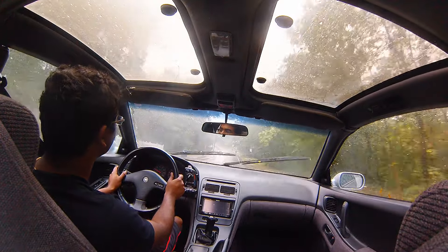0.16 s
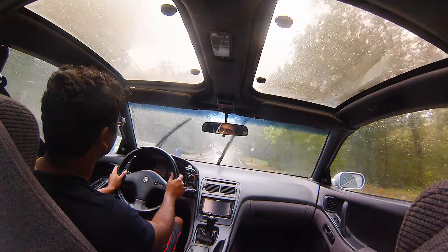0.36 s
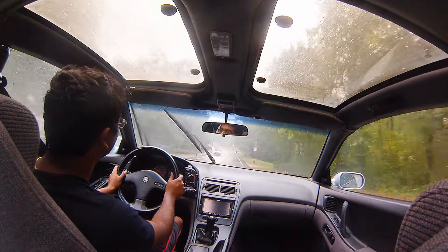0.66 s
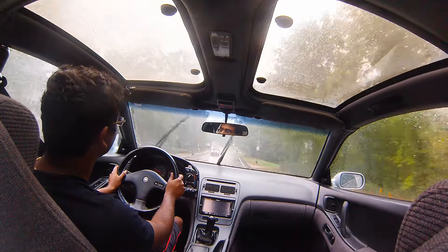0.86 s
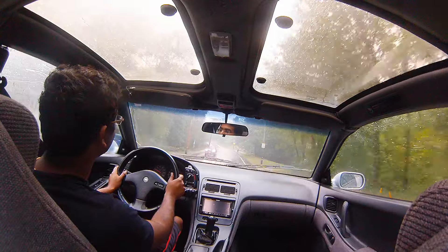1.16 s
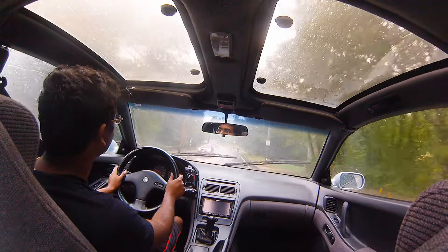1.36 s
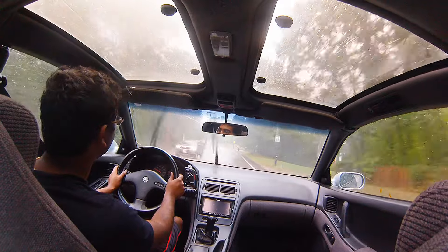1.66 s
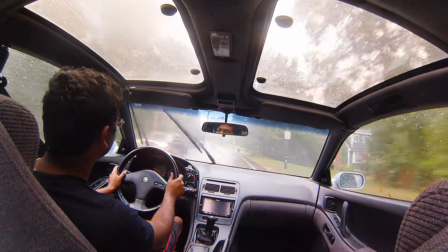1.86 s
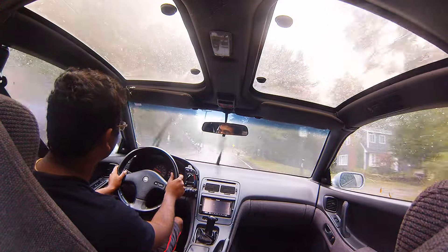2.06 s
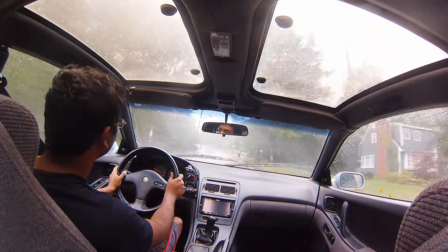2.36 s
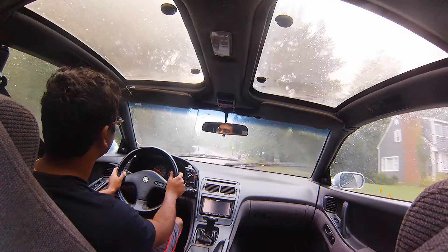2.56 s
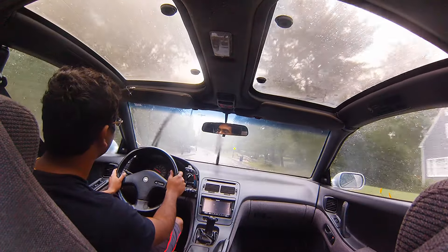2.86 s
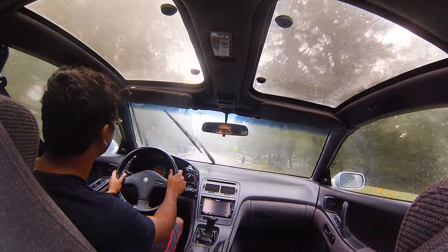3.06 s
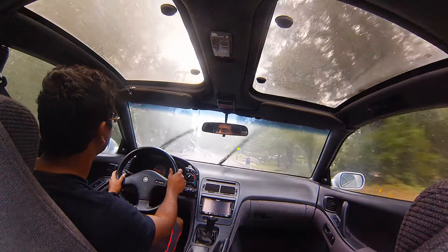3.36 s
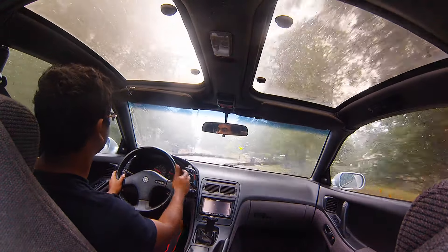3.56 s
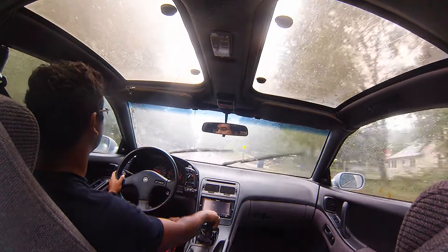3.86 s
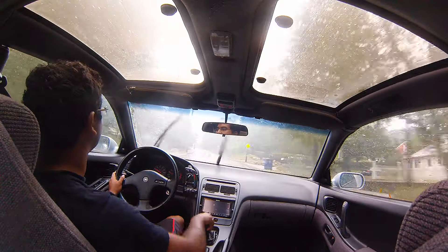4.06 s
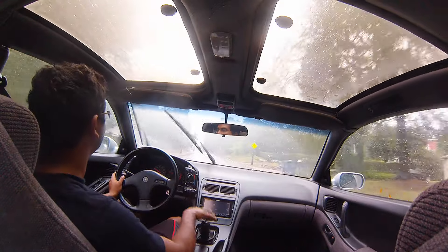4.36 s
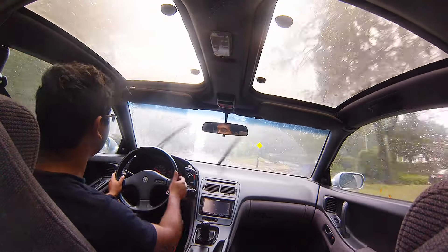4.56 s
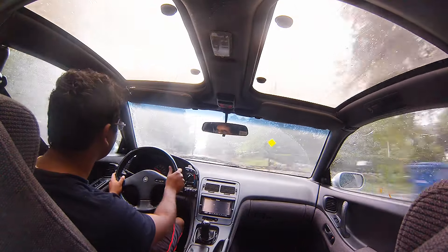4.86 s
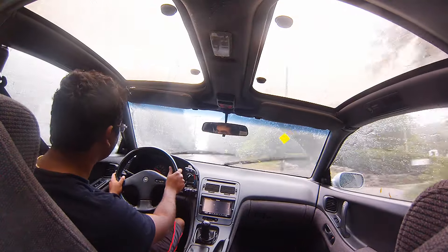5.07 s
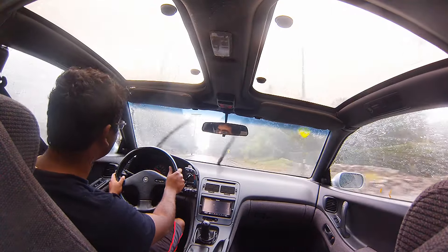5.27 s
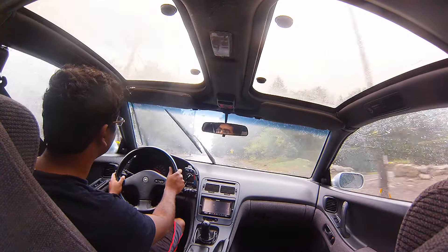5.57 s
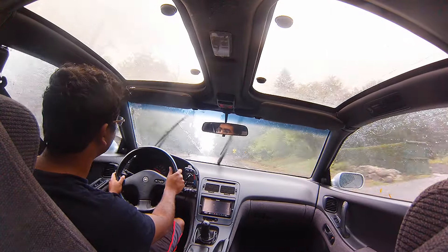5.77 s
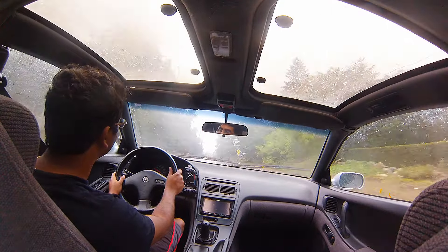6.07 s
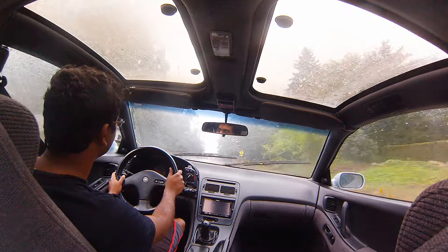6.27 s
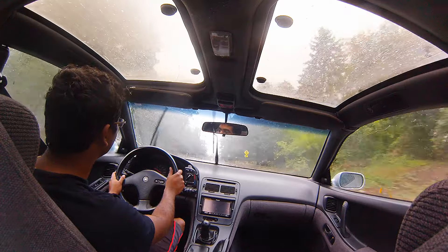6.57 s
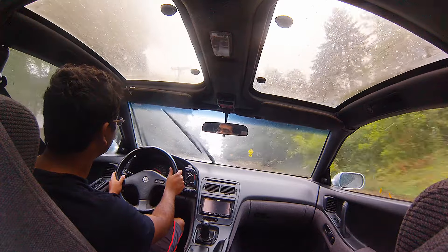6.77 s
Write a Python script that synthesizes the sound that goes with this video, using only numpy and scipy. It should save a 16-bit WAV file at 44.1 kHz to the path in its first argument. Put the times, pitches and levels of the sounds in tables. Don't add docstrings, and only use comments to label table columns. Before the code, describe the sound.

Inside a sports car driving in rain, heard by a small microphone behind the seats. From 0 s a deep six-cylinder boom around 85 Hz dominates, slowly rising to about 92 Hz and growing heavier from 2 s. Beneath it are a low shaft hum, soft irregular bump thuds several times a second and muffled tyre roar; above lies a faint smooth hiss of spray. Isolated drops splat crisply on the glass roof, and a very faint wiper judder comes about every 1.2 s. From 3.1 to 4.3 s drops crowd into a thick pattering shower, loudest around 3.7-4 s. At 3.8-4 s the throttle lifts and the boom collapses; a brief rev flare peaks near 4.3 s with low driveline shudders, dips, and catches again by 4.7 s. The engine then holds a higher tone near 120 Hz, lighter at first, strengthening until 6.9 s, with sparse drops continuing.

```python
import sys
import numpy as np
from scipy import signal
from scipy.fft import rfft, irfft, next_fast_len
from scipy.io import wavfile
from scipy.ndimage import uniform_filter1d

SR = 44100
rng = np.random.default_rng(int(sys.argv[2]) if len(sys.argv) > 2 else 0)


def volts(x):
    e = np.asarray(x, float) / 20
    return 10 ** e


def persist_wave(psi):
    counts = np.round(np.clip(psi, -1, 1) * 32767).astype(np.int16)
    wavfile.write(sys.argv[1], SR, np.atleast_2d(counts).T)


N = 305603

# (time [s], half the firing rate [Hz], firing boom as load [dB], octave over boom as exhaust [dB])
ENGINE_PULL = [(0.0, 42.03, -28.5, -15), (0.6, 42.51, -26, -10.5), (1.21, 43.26, -27, -11.5),
               (1.91, 45.1, -23, -17.5), (2.68, 45.37, -21.5, -20.5), (3.82, 45.83, -21, -20),
               (3.96, 47.06, -27.5, -22), (4.02, 49.2, -43, -19), (4.11, 51.7, -31.5, -11),
               (4.166, 59.4, -43, 2), (4.28, 64.5, -46.5, -0.5), (4.37, 57.5, -49, -21),
               (4.56, 61.47, -38, -3), (4.69, 64.4, -37.5, -15), (4.81, 59.07, -39, -0.5),
               (5.17, 58.99, -33.5, -5.5), (6.3, 60.07, -30.5, -8.5), (6.93, 60.45, -30, -9)]
# (half orders of the crank [count], level [dB], wobble [dB])
UPPER_ORDERS = [(8, -51, -1), (10, -55, 0.5), (14, -56, 2.5), (15, -51, 1), (21, -66.5, 3.5),
                (24, -59, 3.0)]
# (time [s], half length [s], one-bank throb [dB], half tone [dB])
DRIVELINE_SHUDDERS = [
    (3.817, 0.035, -45, -41.5),
    (3.978, 0.026, -36, -40),
    (4.08, 0.047, -31.5, -33.5),
    (4.255, 0.06, -27.5, -60),
    (4.45, 0.061, -30, -49),
    (4.639, 0.037, -55, -55),
    (5.051, 0.1, -48, -62),
    (5.95, 0.085, -43.5, -58),
]
# (time [s], pitch [Hz], level [dB])
SHAFT_HUM = [(0, 39.7, -44), (1, 39.08, -42.5), (1.7, 39.73, -41.5), (2.3, 39.88, -37.5), (4, 40.3, -36),
             (4.8, 39.65, -46.5), (5.7, 39.6, -38), (6.93, 39, -38.5)]
# (time [s], body thud [dB])
ROAD_BUMPS = [(0.0, -35), (0.2, -43), (0.67, -38), (0.99, -32), (1.16, -29.5), (1.49, -33), (1.67, -33.5),
              (1.97, -34.5), (2.28, -32), (2.53, -31), (2.88, -39), (3.18, -36.5), (3.45, -34.5),
              (3.8, -32), (4.26, -36), (4.43, -31.5), (4.61, -28), (5.0, -37), (5.23, -33), (5.53, -36),
              (5.8, -33.5), (6.08, -36.5), (6.36, -32), (6.6, -36.5), (6.84, -38)]
# (frequency [Hz], density [dB per Hz])
THUD_SPECTRUM = [(10, -18.5), (16, 0.5), (27, 2.5), (33, -11), (42, -29.5)]
# (frequency [Hz], density [dB per Hz])
ROAR_SPECTRUM = [(30, -10.5), (45, -6.5), (65, -4), (100, -7.5), (150, -9.5), (210, -15.5), (300, -18.5),
                 (420, -22), (600, -29), (800, -27), (1050, -31.5), (1400, -41.5), (2000, -54.5),
                 (2600, -64.5)]
# (frequency [Hz], width [Hz], level [dB])
CAVITY_RINGS = [(835, 42, -60), (1010, 31, -66), (384, 36, -69), (3360, 350, -78), (666, 58, -69.5)]
# (time [s], peak [dB], brightness as high over low pane ring [dB])
SINGLE_DROPS = [(0.061, -52.5, -5), (0.1502, -46, -8.5), (0.325, -48, -4.5), (0.3875, -51.5, -8.5),
                (0.5488, -53.5, -14), (0.6187, -50.5, -1), (0.753, -47, 1), (0.9828, -50.5, -7),
                (1.04, -54, -0.5), (1.3064, -54.5, 4), (1.611, -50.5, 4), (1.7975, -49.5, 5),
                (2.3226, -57, 5), (2.3422, -46, 1.5), (2.371, -53.5, -17.5), (2.4703, -51.5, -3),
                (2.9359, -51, -5), (3.0779, -52, -4), (4.6467, -54.5, -7.5), (5.1188, -51, -4),
                (5.2248, -57, -5), (5.2533, -49.5, 2), (5.4968, -52, -3), (6.0028, -56, -10.5),
                (6.2111, -53.5, 2), (6.3893, -53, 6.5), (6.4284, -54, 1), (6.637, -53, 0),
                (6.7594, -53, -12), (5.06, -53, 4)]
# (time [s], peak [dB], brightness [dB])
TREE_SHOWER = [(3.134, -58.5, -5.5), (3.1884, -52, -2.5), (3.279, -48.5, 2.5), (3.335, -43.5, -12.5),
               (3.3517, -43, -5.5), (3.4156, -52.5, 7.5), (3.4373, -43, 7.5), (3.4483, -44.5, -10),
               (3.4723, -44.5, -16), (3.4992, -44.5, 0), (3.5312, -47, -3), (3.5967, -55, -4.5),
               (3.604, -50, 1), (3.621, -54, -2), (3.6402, -48.5, 1.5), (3.6518, -50.5, -8),
               (3.6827, -40, -6), (3.6965, -38.5, -2.5), (3.7206, -50, -17.5), (3.74, -55, 10.5),
               (3.782, -49.5, -0.5), (3.8166, -48, 1), (3.8399, -41, -6.5), (3.9172, -47.5, -6),
               (3.967, -39, 2.5), (4.0818, -53.5, -3), (4.1532, -53.5, -8), (4.2016, -52.5, 13),
               (4.2794, -52, -11), (4.3318, -54.5, -8)]
# (frequency [Hz], width [Hz])
PANE_PATCHES = [(3200, 2400), (5400, 1700), (9200, 6900)]
PATCH_SIGNS = (1, -1, 1)
# (time [s], level [dB])
RAIN_STRENGTH = [(0.0, -64), (0.33, -64.5), (3.24, -63), (3.65, -61), (3.94, -64.5), (5.31, -66),
                 (6.62, -64.5), (6.93, -63)]
# (frequency [Hz], density [dB per Hz])
SPRAY_SPECTRUM = [(880, -26), (1500, -6.5), (1780, 0.5), (2090, -5), (2380, -2.5), (3350, -1), (3830, -4),
                  (5540, -4), (6440, -12), (7150, -11), (9230, -18), (13000, -19.5), (14400, -34.5)]
# (time [s], rub [dB], half length [s])
WIPER_TURNS = [(0.651, -66, 0.014), (1.884, -66.5, 0.028), (3.107, -69, 0.023), (4.32, -66, 0.014),
               (5.55, -70, 0.018), (6.776, -72, 0.023)]


def rms_one(x):
    return x / np.sqrt(np.mean(x ** 2) + 1e-20)


def in_time(rows):
    s, *columns = np.transpose(rows)
    return [np.interp(np.arange(N) / SR, s, c) for c in columns]


def drift(rate):
    r = np.exp(-80 * np.pi * rate / SR)
    noise = rng.standard_normal(N // 40 + 2002)
    slow = rms_one(signal.lfilter([1], [1, -2 * r, r * r], noise)[2000:])
    return np.interp(np.arange(N) / 40, np.arange(len(slow)), slow)


def swells(times, db, half_s, rest_db, order=2):
    t = np.arange(N // 64 + 2) * 64 / SR
    bells = volts(db) * np.exp(-((t[:, None] - times) / half_s) ** order)
    level_db = 20 * np.log10(volts(rest_db) + bells.sum(axis=1))
    return np.interp(np.arange(N) / SR, t, level_db)


def coloured(x, spectrum):
    hz, level_db = np.transpose(spectrum)
    size = next_fast_len(len(x))
    grid = np.maximum(np.fft.rfftfreq(size, 1 / SR), 1)
    gain_db = np.interp(np.log(grid), np.log(hz), level_db, left=-90, right=-90)
    return irfft(rfft(x, size) * volts(gain_db), size)[:len(x)]


def resonance(x, hz, width_hz):
    r = np.exp(-np.pi * width_hz / SR)
    top = np.array([1, 0, -1]) * (1 - r * r) / 2
    return signal.lfilter(top, [1, -2 * r * np.cos(2 * np.pi * hz / SR), r * r], x)


def double_resonance(x, hz, width_hz):
    return resonance(resonance(x, hz, width_hz), hz, width_hz)


def engine():
    half_hz, boom_db, open_db = in_time(ENGINE_PULL)
    octave_db = boom_db + open_db
    boom_db = boom_db + 0.016 * (-20 - boom_db) * 2 * drift(7.1)
    s, half_s, throb_db, half_db = np.transpose(DRIVELINE_SHUDDERS)
    throb_db = swells(s, throb_db, half_s, -50.5, order=4)
    half_db = swells(s, half_db, half_s, -58.5, order=4)
    angle = 2 * np.pi * np.cumsum(half_hz) / SR + 0.017 * drift(6.7)

    def tone(k, db, wobble_db):
        level = np.sqrt(2) * volts(db + wobble_db * drift(35))
        return level * np.sin(k * angle + rng.uniform(0, 2 * np.pi))

    out = tone(2, boom_db, 0.085) + tone(4, octave_db, 0.38)
    out = out + tone(0.98, throb_db, 2.4) + tone(3, half_db, 0.4)
    out = out + tone(6, 0.71 * (boom_db + 16.0) - 52.0, 2.4)
    load_db = 0.6 * (octave_db + 32.5)
    for k, db, wobble_db in UPPER_ORDERS:
        out = out + tone(round(k) / 3, db + load_db, wobble_db)
    return out


def shaft():
    hz, level_db = in_time(SHAFT_HUM)
    level = np.sqrt(2) * volts(level_db + 0.89 * drift(3.4))
    return level * np.sin(2 * np.pi * np.cumsum(hz) / SR)


def road():
    bump_s, smooth_road_db = 0.06, -45.5
    thud_db = swells(*np.transpose(ROAD_BUMPS), bump_s, smooth_road_db)
    roar_db = -50 + 0.88 * drift(4.0) + 0.024 * (thud_db - thud_db.mean())
    sway = coloured(rng.standard_normal(N), THUD_SPECTRUM)
    sway = sway / np.sqrt(uniform_filter1d(sway ** 2, size=3500) + 1e-12)
    thud = volts(thud_db) * rms_one(coloured(sway, THUD_SPECTRUM))
    roar = volts(roar_db + 11) * rms_one(coloured(rng.standard_normal(N), ROAR_SPECTRUM))
    white = rng.standard_normal(N)
    rings = 0
    for hz, width_hz, db in CAVITY_RINGS:
        rings = rings + volts(db) * rms_one(double_resonance(white, hz, width_hz))
    return thud + roar * volts(0.17 * drift(20)) + rings * volts(roar_db + 48.5)


def drops():
    ring_db, edge_db, edge_follows = -10.5, -19.5, 0.3
    t60_s, attack_s = 0.043, 0.0016
    out = np.zeros(N)
    t = np.arange(int(0.1 * SR)) / SR
    hits = list(SINGLE_DROPS) + list(TREE_SHOWER)
    noise = rng.standard_normal((len(hits), len(t)))
    for (s, db, bright_db), burst in zip(hits, noise):
        patch_db = ring_db - bright_db / 2, ring_db + bright_db / 2, edge_db + edge_follows * bright_db
        burst = burst * volts(-60 * t / t60_s) * np.minimum(t / attack_s, 1)
        burst[70] += 3.1
        splat = 0
        for (hz, width_hz), sign, gain_db in zip(PANE_PATCHES, PATCH_SIGNS, patch_db):
            ring = double_resonance(burst, hz, width_hz)
            ring = ring / np.sqrt(np.sum(ring ** 2) / (0.00081 * SR))
            splat = splat + sign * volts(gain_db) * ring
        at = round((s - 0.0005) * SR)
        out[at:at + len(t)] += (volts(db + 3.0) * splat)[:N - at]
    return out


def rain():
    spray_db, = in_time(RAIN_STRENGTH)
    drops_per_s, decay_s = 250, 0.0048
    sizes = volts(4.7 * np.minimum(rng.exponential(1, N), 3)) * (rng.random(N) < drops_per_s / SR)
    fade = np.exp(-1 / (decay_s * SR))
    patter = signal.lfilter([1], [1, -fade], sizes + 1e-18) * rng.standard_normal(N)
    spray = rng.standard_normal(N) * volts(0.84 * drift(13))
    mix = spray + volts(-7.5) * rms_one(patter)
    return volts(spray_db - 1.0) * rms_one(coloured(mix, SPRAY_SPECTRUM))


def wiper():
    rub_hz, width_hz, judder_hz = 3590, 670, 30
    t = np.arange(N) / SR
    rub = 0
    for s, db, half_s in WIPER_TURNS:
        judder = 1 - 0.69 * np.cos(2 * np.pi * judder_hz * (t - s))
        rub = rub + volts(db) * judder * np.exp(-((t - s) / half_s / 1.3) ** 4)
    return rub * rms_one(double_resonance(rng.standard_normal(N), rub_hz, width_hz))


def scene():
    return (engine() + shaft() + road() + drops() + rain() + wiper())[None]


def low_pass(x):
    return signal.sosfilt(signal.butter(12, 14550, fs=SR, output="sos"), x)


def record(dry):
    return low_pass(dry)


dry = scene()
out = record(dry)
persist_wave(out)
```